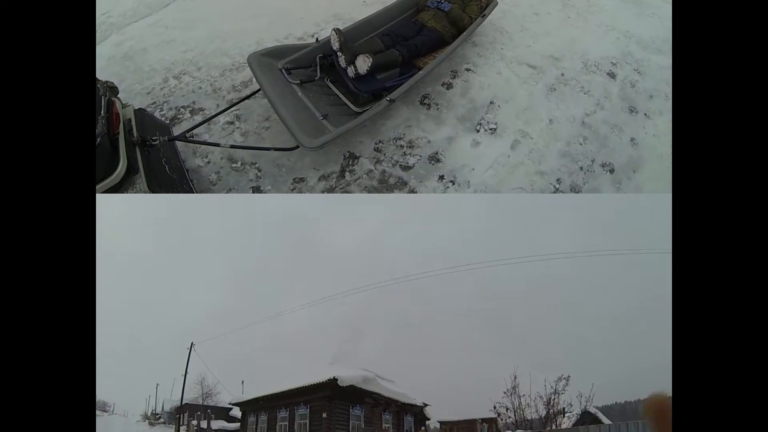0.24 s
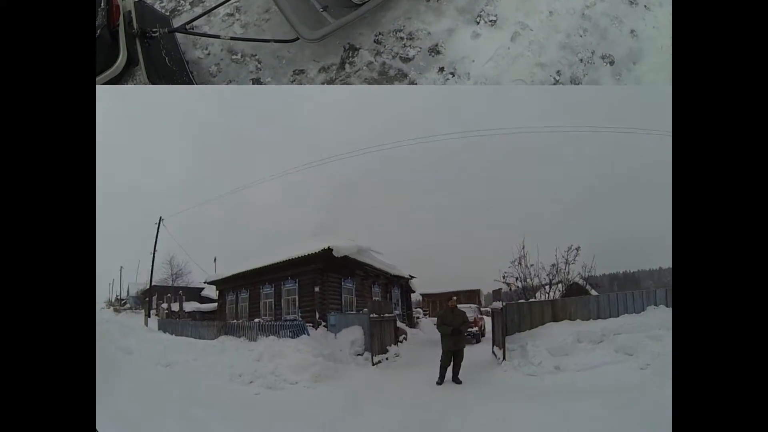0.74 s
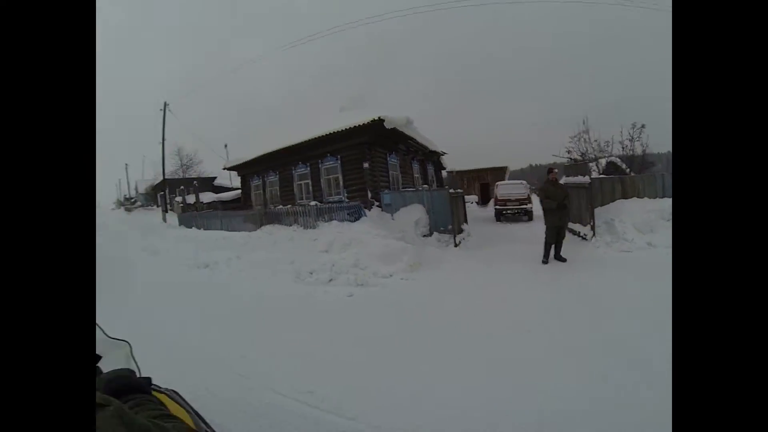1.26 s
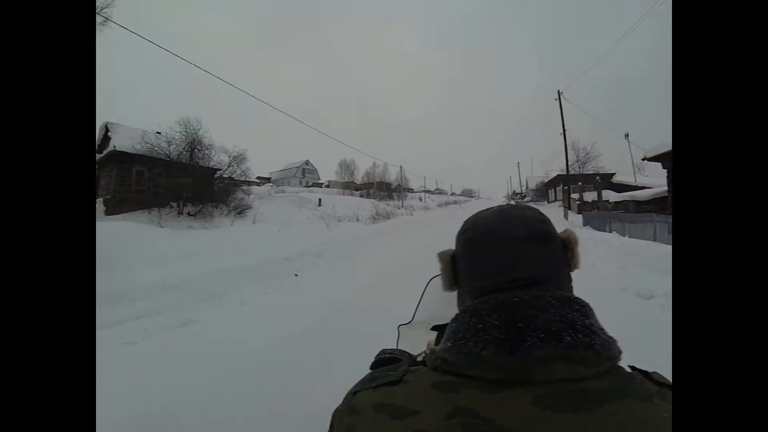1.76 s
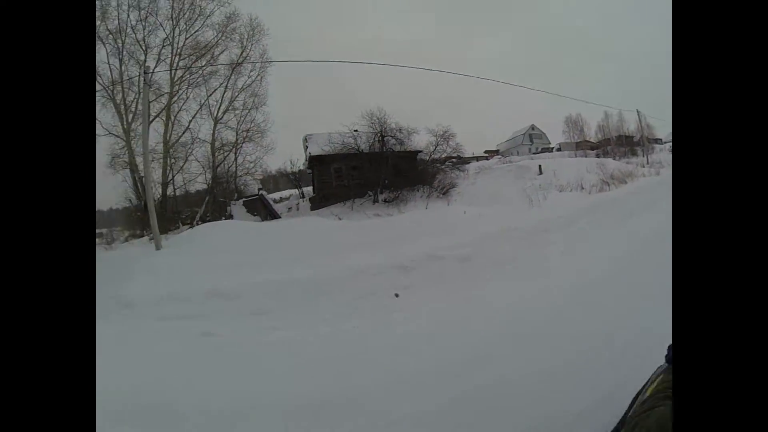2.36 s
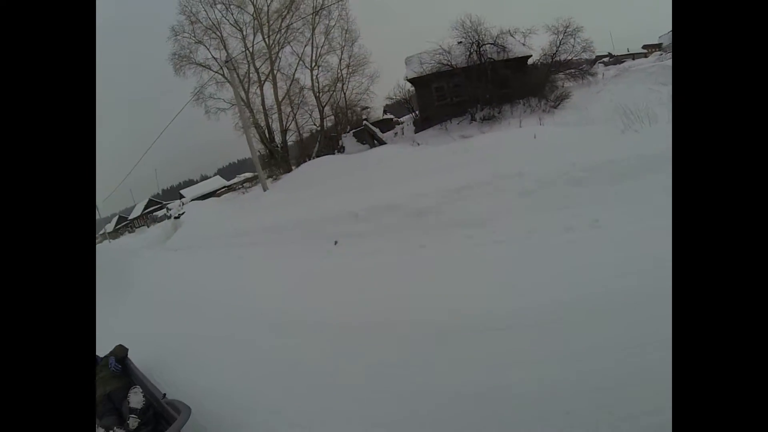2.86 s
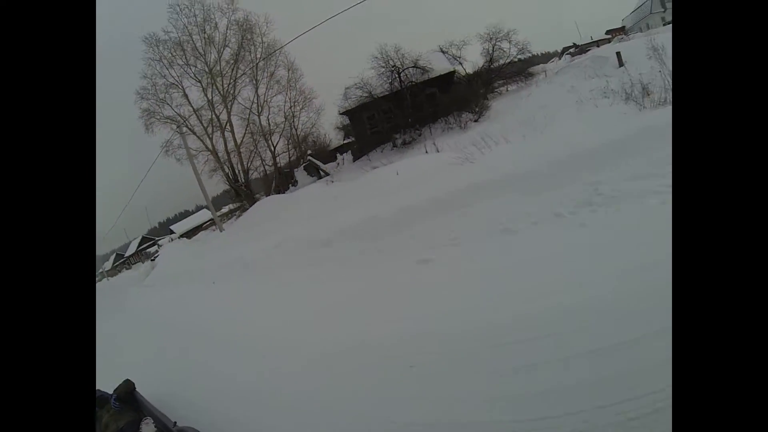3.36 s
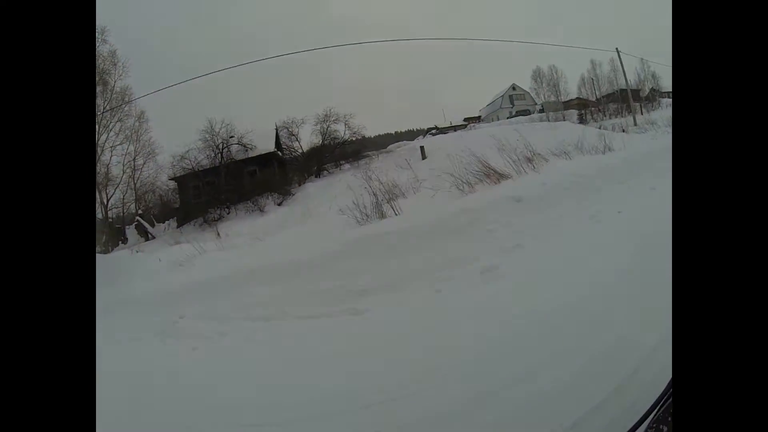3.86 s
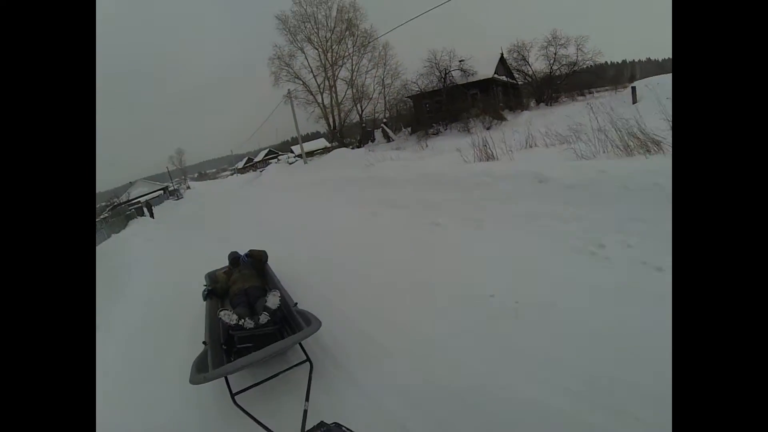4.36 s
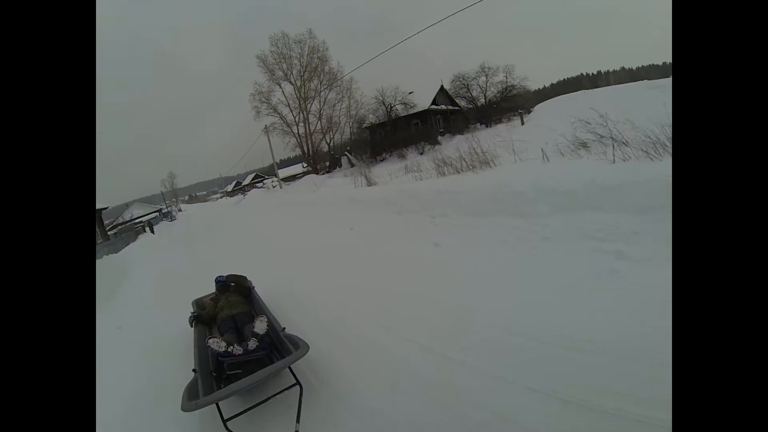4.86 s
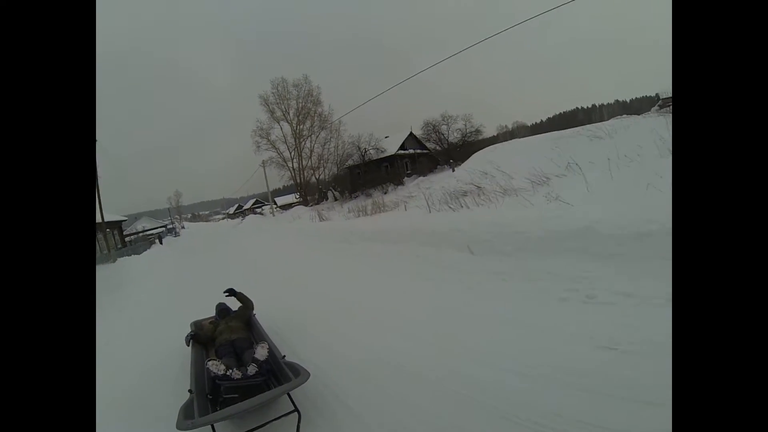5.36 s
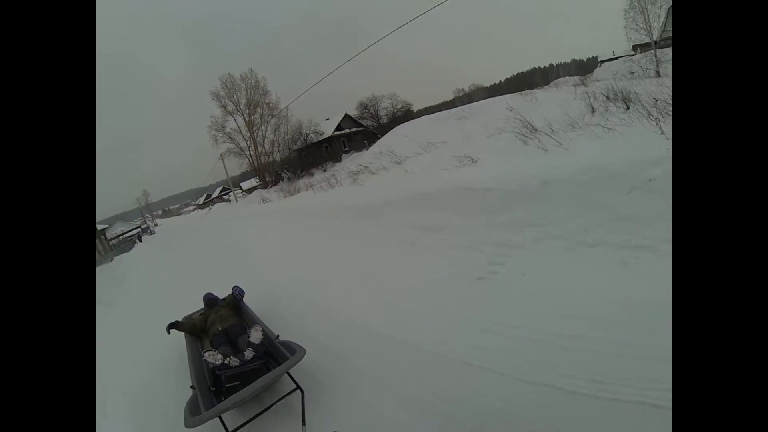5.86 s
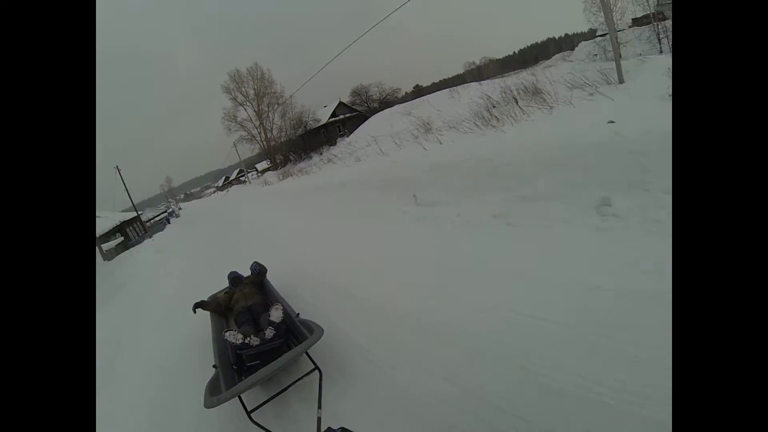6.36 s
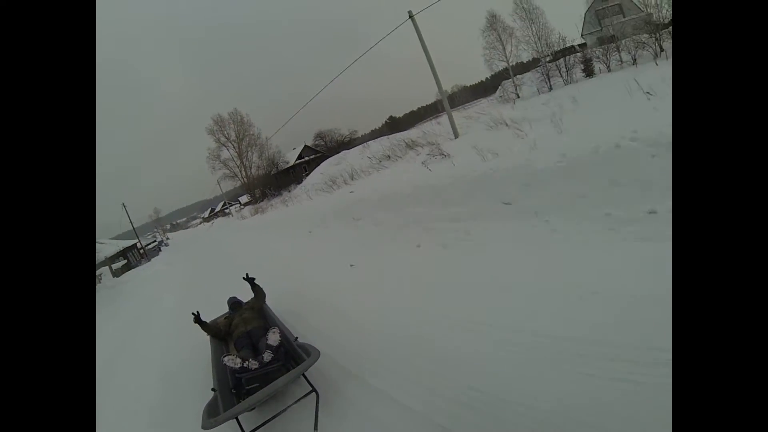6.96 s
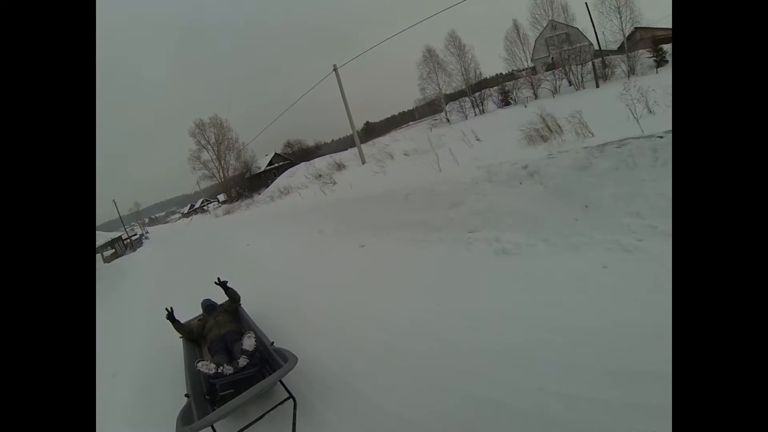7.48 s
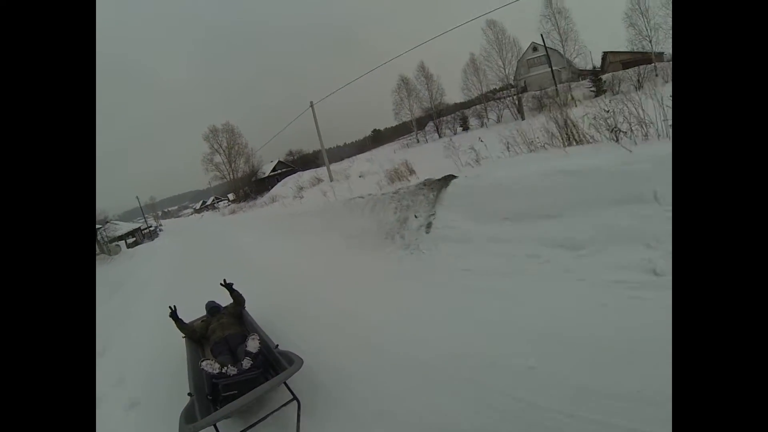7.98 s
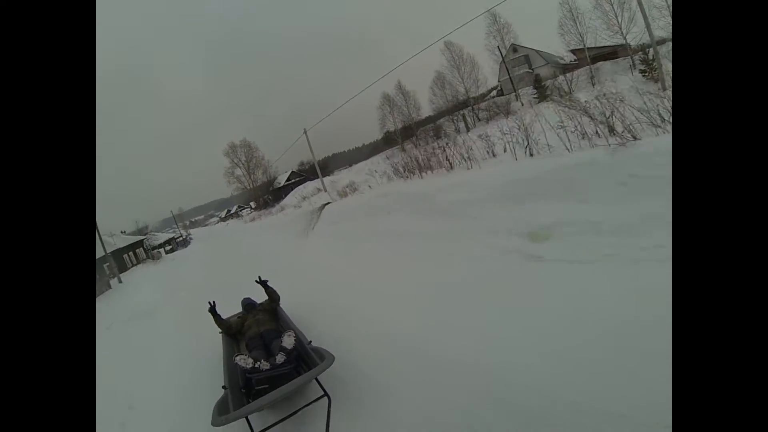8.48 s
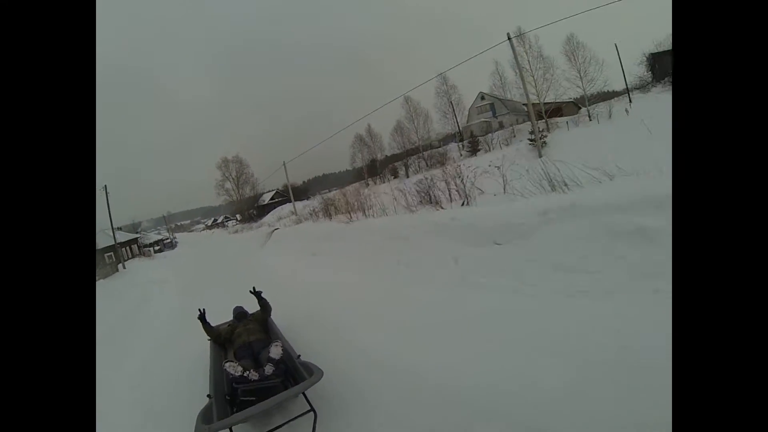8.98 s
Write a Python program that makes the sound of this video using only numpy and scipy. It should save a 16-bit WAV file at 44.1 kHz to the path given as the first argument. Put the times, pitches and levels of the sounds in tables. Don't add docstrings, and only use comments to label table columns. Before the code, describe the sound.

Outdoors on snow, with a muffled microphone riding on the snowmobile. First handling scrape and clicks, then abrupt silence for an instant. The twin-cylinder engine rises from low throb to raspy, steady high drone, joined by a track hum and grainy snow hiss. Rumbling airflow and sharp wind thumps grow heavy, making the level dip and recover repeatedly.

```python
import sys
import numpy as np
from scipy import signal
from scipy.fft import rfft, irfft, next_fast_len
from scipy.io import wavfile
from scipy.ndimage import map_coordinates

SR = 44100
rng = np.random.default_rng(int(sys.argv[2]) if len(sys.argv) > 2 else 0)


def volts(x):
    e = np.asarray(x, float) / 20
    return 10 ** e


def put_to_file(sound):
    columns = np.atleast_2d(sound).T
    safe = np.clip(columns, -1, 1)
    whole_steps = np.round(safe * 32767)
    wavfile.write(sys.argv[1], SR, whole_steps.astype(np.int16))


N = 407043


def unit(x):
    return x / np.sqrt(np.mean(x ** 2) + 1e-20)


def along(points, hz):
    f, v = np.transpose(points)
    return np.interp(np.log(hz + 1), np.log(f + 1), v)


def curves(rows):
    s, *cols = np.transpose(rows)
    return [np.interp(np.arange(N) / SR, s, c) for c in cols]


def wobble(rate, step=1):
    knots = rng.standard_normal(int(N * rate / SR) + 4)
    return map_coordinates(knots, [np.arange(0, N, step) * rate / SR])


def bumps(rows):
    ms = np.arange(0, N, 64) / SR * 1000
    total_db = sum(db * np.exp(-((ms - 1000 * s) / width_ms) ** 2) for s, db, width_ms in rows)
    return np.interp(np.arange(N) / SR * 1000, ms, total_db)


def filtered(x, response):
    m = next_fast_len(N + SR // 2)
    return irfft(rfft(x, m) * response(np.fft.rfftfreq(m, 1 / SR)), m)[:N]


def resonances(modes, f):
    total = 0
    for k, (centre, width, db) in enumerate(modes):
        damping = 1j * f * width
        total = total + (-1) ** k * volts(db) * damping / (centre * centre - f * f + damping)
    return total


def coloured(spectrum, gate):
    return unit(filtered(gate * rng.standard_normal(N), lambda hz: volts(along(spectrum, hz))))


# f/Hz, level/dB per Hz
SNOW_HISS = [(590, -11), (1000, -2), (1500, -4.5), (2930, -15.5), (4920, -28), (6000, -30), (8000, -26),
             (15000, -41)]
# t/s, level/dB, width/ms
HISS_SWELLS = [(.228, -1, 14), (.5, 0.5, 73), (1.22, 1.5, 20), (1.6, 0.5, 59), (1.9, 4.5, 16),
               (2.03, -1, 30), (2.45, 0.5, 80), (2.67, 3, 51), (3.05, -4, 89), (3.52, 0, 25),
               (3.73, -1, 40), (4.14, 3, 75), (4.25, 2.5, 23), (4.78, -2.5, 50), (4.94, 5.5, 82),
               (5.65, 0.5, 27), (5.81, 0, 20), (6.38, 4, 20), (6.535, 6, 28), (6.62, 3, 15),
               (6.735, 5.5, 24), (7.05, 2, 20), (7.3, 2.5, 52), (7.5, -4, 63), (7.8, 3, 25),
               (8.13, -2, 18), (8.31, 3, 23), (8.45, 4, 20), (8.56, 0.5, 26), (8.64, 4.5, 29),
               (9.14, 4, 60)]
# t/s, crack level/dB, knock level/dB
ICE_CHIPS = [(0.4364, -42, -32), (0.7277, -31, -29), (1.0844, -27, -26), (1.2585, -28, -28),
             (1.3434, -24.5, -22.5), (1.8871, -32, -18), (2.1874, -32, -14), (2.2697, -29, -20),
             (2.5311, -28, -23), (2.6339, -24, -16), (2.6798, -21, -15), (3.1597, -34, -29),
             (3.2405, -26, -21), (3.2495, -35, -18), (3.5957, -27, -12.5), (3.6874, -24, -31),
             (3.8267, -25, -26), (4.0183, -27, -25), (4.349, -22, -13), (4.4184, -25, -17),
             (4.4563, -26, -16), (4.5855, -29, -26), (4.6554, -25.5, -21), (4.8319, -37, -19),
             (4.8643, -30, -27), (4.8894, -30, -25), (4.9132, -30, -18), (4.935, -30, -16),
             (5.0574, -33, -29), (5.1098, -22, -20), (5.1374, -30, -20), (5.1694, -24, -27),
             (5.229, -22.5, -34), (5.3118, -26, -30), (5.3393, -24, -16), (5.5594, -29, -15),
             (5.8052, -27, -15), (6.0057, -26, -28), (6.0621, -24, -19), (6.4098, -22, -8.5),
             (6.5076, -33, -18), (6.548, -25, -25), (6.786, -27, -23), (6.8834, -31, -17.5),
             (7.0184, -27, -20), (7.3462, -28, -20), (7.7484, -25, -16), (7.9399, -29, -18),
             (8.0484, -37, -18.5), (8.1324, -32, -12.5), (8.2087, -24, -24), (8.307, -31, -22),
             (8.5939, -27, -16), (8.9244, -24.5, -18), (8.9431, -31.5, -18)]


def snow():
    firing = np.cos(2 * 2 * np.pi * np.cumsum(curves(SHAFT)[0]) / SR)
    grains = volts(1.3 * wobble(400) + 0.95 * wobble(30)) * (1 + .12 * firing)
    chips, t = np.zeros(N + 400), np.arange(400) / SR
    knock_t60_s, crack_t60_s = 0.0068, 0.025
    for s, crack_db, knock_db in ICE_CHIPS:
        knock_hz = 650 * (1 + 0.095 * rng.standard_normal())
        knock = volts(knock_db + 12 - 60 * t / knock_t60_s) * np.sin(2 * np.pi * knock_hz * t)
        crack = volts(crack_db + 12 - 60 * t / crack_t60_s) * rng.standard_normal(len(t))
        chips[round(s * SR):][:len(t)] += knock + crack
    dull = filtered(chips[:N], lambda hz: resonances([(900, 1600, 0)], hz) / (1 + 1j * hz / 1300))
    drift_db = .3 * wobble(6) + bumps(HISS_SWELLS)
    return volts(curves(FLOW_LEVELS)[1] + 4.5 + drift_db) * coloured(SNOW_HISS, grains) + dull


# t/s, width/s, level/dB
POWDER = (2.35, .3, -36.5)


def spray():
    at_s, width_s, peak_db = POWDER
    level_db = peak_db - 20 - 9 * ((np.arange(N) / SR - at_s) / width_s) ** 2
    spectrum = [(3800, -30), (5000, -3), (6500, 0), (8000, 3.5), (10000, -11)]
    return volts(level_db) * coloured(spectrum, volts(1.2 * wobble(300)))


# t/s, f/Hz, level/dB
LUG_HUM = [(2.3, 118, -38.5), (2.65, 124, -27.5), (3.1, 131, -27), (3.5, 136, -32), (5.4, 148, -31.5),
           (5.65, 154, -23), (6.1, 171, -23), (6.45, 173.5, -25.5), (6.8, 166, -31.5), (7.3, 172, -30),
           (9.23, 170, -33)]


def track():
    hz, level_db = curves(LUG_HUM)
    turn = 2 * np.pi * np.cumsum(hz) / SR + .4 * wobble(12)
    not_yet = np.arange(N) / SR < LUG_HUM[0][0]
    level_db = level_db - 60 * not_yet + 1.5 * wobble(8)
    octave_db = -11
    return np.sqrt(2) * volts(level_db) * (np.sin(turn) + volts(octave_db) * np.sin(2 * turn))


# t/s, signed jab size, width/ms, gain cut/dB
HARD_GUSTS = [(2.126, -0.62, 1.8, 1.5), (2.279, 0.55, 4.1, 2), (2.452, 0.96, 2.1, 0), (2.76, -0.88, 4.5, 7),
              (3.057, -0.91, 2, 10), (3.183, -0.44, 1.1, 6.5), (3.282, 0.86, 1.3, 1.5),
              (3.356, 0.62, 1.4, 5.5), (3.456, 0.89, 1.9, 4), (3.481, -0.86, 2, 9), (3.602, -1, 1.3, 10),
              (3.703, 0.74, 4.2, 10), (3.863, -1.8, 1.5, 4.5), (4.028, 0.68, 2.8, 4),
              (4.194, -1.25, 2.4, 11.5), (4.352, 0.76, 2.1, 2.5), (4.628, 0.84, 2.1, 0.5),
              (4.953, -0.56, 1.7, 6), (5.111, 0.71, 0.69, 2), (5.87, -1.3, 1.3, 7.5), (6.11, -0.33, 1.2, 4),
              (6.286, -0.58, 3.5, 2.5), (6.56, -0.79, 1.1, 2), (6.886, -1.85, 0.89, 2.5),
              (6.939, -1.2, 1.6, 3.5), (7.208, -0.11, 2.7, 8), (7.359, -0.87, 0.8, 2),
              (7.657, -0.69, 6.8, 12), (8.05, -0.44, 0.81, 2.5), (8.26, -0.78, 3.7, 6),
              (8.531, 0.39, 6.7, 3), (8.828, -1.3, 3.4, 14.5)]


def gusts():
    t = np.arange(0, N, 16) / SR
    air_db, ride_db, cut_db = 0, 0, 0
    air_swell_s, ride_swell_s, attack_s, recovery_s = 0.015, 0.25, .003, 0.084
    for s, _, _, depth_db in HARD_GUSTS:
        late = np.maximum(t - s - .002, 0)
        building = depth_db * (late == 0)
        air_db = air_db + 0.045 * building * np.exp(-((t - s) / air_swell_s) ** 2)
        ride_db = ride_db + 0.068 * building * np.exp(-((t - s) / ride_swell_s) ** 2)
        recovery = np.exp(-(late / recovery_s) ** 1.05)
        cut_db = cut_db + depth_db * (1 - np.exp(-late / attack_s)) * recovery
    return [np.interp(np.arange(N) / SR, t, db) for db in (air_db, ride_db, cut_db)]


def jab(s, size, width_ms):
    span = np.arange(-900, 900)
    t = span / SR * 1000 / width_ms[:, None]
    kick = np.exp(-np.sqrt(.16 + 2.2 * t * t)) * 1.7 - .3 * np.exp(-(t / 2.5) ** 2)
    at = np.clip(np.round(s * SR).astype(int)[:, None] + span, 0, N - 1)
    return np.bincount(at.ravel(), (size[:, None] * kick).ravel(), N)


# t/s, airflow level/dB, snow hiss level/dB
FLOW_LEVELS = [(.22, -42, -54.5), (.7, -23, -45), (1.22, -18, -36), (1.45, -15.5, -40), (1.62, -13, -44.5),
               (2.3, -14, -39), (2.7, -26, -30.5), (2.95, -14.5, -29.5), (3.2, -16, -34.5),
               (4.18, -15.5, -35), (4.45, -14, -41), (5.5, -13.5, -41), (5.85, -15.5, -37.5),
               (6.72, -14.5, -40.5), (7.22, -15, -39), (7.6, -14, -35.5), (8.5, -10.5, -37.5),
               (9.23, -17, -42.5)]
# f/Hz, level/dB per Hz
BUFFET_SPECTRUM = [(8.8, -32), (15, 5), (37, -1), (86, 1), (162, -8), (454, -18.5), (780, -43),
                   (1320, -120)]
# t/s, level/dB, width/ms
HEAVES = [(1.083, -4.2, 52), (1.856, -2, 25), (2.03, 2, 75), (2.155, -3.5, 43), (2.28, 2.5, 70),
          (2.375, -2.5, 55), (2.454, 2, 29), (2.629, -2, 54), (2.754, 3, 80), (2.799, -7.4, 26),
          (2.928, -1.5, 20), (3.043, 0.5, 70), (3.153, -6, 30), (3.228, -12, 21), (3.317, -8, 18),
          (3.357, 3.5, 35), (3.402, -12, 23), (3.467, 4.1, 48), (3.517, -5.5, 61), (3.602, 3, 27),
          (3.697, 0, 21), (3.737, -12, 32), (3.861, 1, 54), (3.971, -3, 44), (4.021, 2.5, 26),
          (4.061, -5, 32), (4.121, 5, 27), (4.161, -11, 22), (4.195, 0, 30), (4.235, -9.0, 27),
          (4.744, -5.5, 24), (4.954, 1, 30), (5.408, -7, 23), (5.672, -2.5, 32), (5.867, 1.5, 47),
          (5.991, -4, 35), (6.331, -7.5, 27), (6.42, 4.5, 91), (6.525, -3, 39), (6.829, -2.5, 30),
          (6.939, 0.5, 60), (6.969, -6.5, 43), (7.328, -3, 34), (7.463, -7, 25), (7.543, -8, 26),
          (7.658, 1.5, 44), (7.797, -1.5, 85), (8.027, 2.5, 46), (8.296, -4, 22), (8.526, -0.5, 64),
          (8.73, 2, 41), (8.785, -5, 29), (8.83, 2, 34), (8.865, -4.5, 42), (8.975, -6, 17), (9.134, 2, 23)]
# t/s, signed size, width/ms
OTHER_JABS = [(0.736, -0.49, 1.2), (0.924, -0.47, 0.81), (1.156, -0.9, 1.1), (1.334, -0.38, 0.62),
              (1.385, 0.92, 0.95), (1.403, -0.96, 0.83), (1.432, -1, 1.1), (1.735, 0.27, 1.7),
              (1.89, -0.77, 0.51), (2.544, -0.21, 1.8), (2.721, 0.34, 0.78), (2.741, -0.53, 1.4),
              (2.888, -0.82, 0.34), (2.906, 0.24, 1.4), (2.958, -0.25, 1.7), (3.034, -0.73, 3.5),
              (3.454, 1, 0.84), (3.549, -0.86, 1.8), (3.8, -0.68, 1.6), (4.012, 0.44, 1.8),
              (4.111, -1, 0.67), (4.131, -0.42, 2), (4.304, 0.65, 1.3), (4.424, 0.58, 0.62),
              (4.488, -0.55, 1.3), (4.536, -0.76, 2.2), (4.557, 0.55, 1.5), (4.771, -0.21, 1.5),
              (4.779, -0.79, 3.6), (4.921, -0.76, 0.49), (5.019, 0.66, 2), (5.227, 0.66, 1.7),
              (5.34, 0.52, 0.98), (5.595, -0.45, 0.7), (5.716, 0.78, 1.2), (5.744, 0.99, 0.75),
              (5.83, -0.85, 0.72), (6.035, 0.55, 1.3), (6.065, -1.1, 1.5), (6.158, -1, 1.2),
              (6.211, -0.78, 0.7), (6.409, 0.89, 1.4), (6.426, 0.8, 1.3), (6.668, -0.69, 1.1),
              (6.718, -0.85, 0.94), (6.758, -0.94, 1.7), (6.788, -0.69, 2.2), (7.05, -0.77, 1.1),
              (7.422, -0.9, 3.1), (7.576, 0.13, 1.6), (7.824, 1, 0.77), (8.112, -0.7, 1.1),
              (8.335, -0.78, 1.6), (8.598, 0.6, 0.74), (8.636, 1, 0.92), (8.724, -0.61, 1.6),
              (8.948, -0.61, 1.5), (9.01, -0.66, 1.7), (9.139, -0.73, 2.3), (9.193, -0.52, 0.82)]


def wind(swell_db):
    heave_db = bumps(HEAVES)
    buffet = volts(curves(FLOW_LEVELS)[0] + swell_db + heave_db)
    air = buffet * coloured(BUFFET_SPECTRUM, volts(1.8 * wobble(65) + 1.1 * wobble(14)))
    s, size, width_ms = np.transpose([row[:3] for row in HARD_GUSTS + OTHER_JABS])
    air += jab(s, 1.34 * size, width_ms)
    from_s, count = 1.8, 40
    when, side, big, wide = rng.random((count, 4)).T
    s = from_s + (np.arange(count) + when) / count * (N / SR - from_s)
    size = np.sign(side - .6) * 0.33 * (.5 + big) * volts(heave_db[(s * SR).astype(int)])
    air += jab(s, size, 3 * np.exp(0.25 * 3 * (wide - .5)))
    eddies = (rng.random(N) < 60 / SR) * rng.standard_normal(N)

    def eddy_response(hz):
        rise = (hz / 90) / (1 + hz / 90)
        return rise / (1 + (hz / 330) ** 2) / (1 + (hz / 800) ** 4)

    return air + volts(-12.5) * buffet * unit(filtered(eddies, eddy_response))


# t/s, rub level/dB, thud level/dB
SCRAPE_LEVELS = [
    (0, -57, -40),
    (.023, -53, -49),
    (.03, -40.5, -50),
    (.07, -37, -56),
    (.1, -46.5, -58),
    (.112, -39.5, -57),
    (.136, -40.5, -49),
    (.142, -61, -53),
    (.19, -73, -52),
]
# f/Hz, width/Hz, level/dB
MOUNT_MODES = [(845, 820, 1), (1730, 360, 5.5), (2620, 560, 0), (3840, 320, 4), (5270, 460, -3),
               (6600, 310, -13)]
# t/s, peak level/dB, f/Hz
MOUNT_CLICKS = [
    (0.104, -27, 1670),
    (.146, -28, 1230),
    (.156, -17, 1110),
]


def mount():
    rub_db, thud_db = curves(SCRAPE_LEVELS)

    def plastic(f):
        return sum(resonances([mode], f) ** 2 for mode in MOUNT_MODES) * (1 + (f / 6500) ** 4)

    rub = unit(filtered(volts(.6 * wobble(293)) * rng.standard_normal(N), plastic))
    thud = coloured([(20, -25), (60, 15.0), (150, -10.5), (300, -5), (700, -28)], 1)
    sound = volts(rub_db) * rub + volts(thud_db) * thud
    fizz_s, fizz_span_s = 0.07, .022
    fizz_db = -46 - 8 * ((np.arange(N) / SR - fizz_s) / fizz_span_s) ** 2
    sound += volts(fizz_db) * coloured([(4500, -47), (7500, 2), (12000, -5.0), (15000, -26)], 1)
    t = np.arange(2000) / SR
    for s, db, hz in MOUNT_CLICKS:
        snap = np.sin(2 * np.pi * hz * t) + 0.031 * np.sin(2 * np.pi * 3600 * t)
        ring = volts(db - 25 - 60 * t / .15) * np.sin(2 * np.pi * 640 * t)
        sound[round(s * SR):][:len(t)] += volts(db - 60 * t / .006) * snap + ring
    return sound


# t/s, shaft f/Hz, load level/dB, exhaust and intake level/dB toward the port
SHAFT = [(.22, 60.7, -37, -28.5, -33.5), (.63, 62.6, -25, -15.5, -26.5), (.78, 64.3, -23.5, -18, -24),
         (1.3, 67.08, -14.5, -5, -40), (1.6, 69.63, -16.5, -21, -21.5), (2.13, 76.9, -19, -20, -16.5),
         (2.53, 86.2, -15, -15.5, -17.5), (2.72, 88.66, -11.5, -28, -14), (2.9, 90.9, -17.5, -26, -19.5),
         (3.85, 93.54, -19, -16.5, -22.5), (4.15, 97.7, -17, -16, -21), (4.6, 96.75, -23.5, -30, -37.5),
         (5.56, 97.3, -24, -22, -26), (5.89, 105.4, -15.5, -14.5, -22.5), (6.17, 107.3, -22.5, -18, -26.5),
         (6.79, 104.3, -25, -39, -29), (7.4, 108.3, -24, -40.5, -26), (9.23, 100.6, -26, -26, -31)]
# f/Hz, width/Hz, level/dB
PIPE_MODES = [
    [(120.8, 28, 2.5), (190.7, 17, -0.5), (251.7, 62, 3.5), (368, 74, -3.5)],
    [(446.5, 21.4, 0), (536, 62, -14.5), (756, 73, -13.5)],
    [(1180, 100, -10), (1430, 130, -6.5), (1572, 80, -6.5), (1820, 180, -14)],
    [(87, 43, 1), (666, 214, -3.5), (1037, 72, -7), (1185, 61, -9)],
]
# level/dB, dB per Hz over idle, share of load, of exhaust, of intake
VOICE_MIX = [
    (-4, -0.266, 0.8, .01, 0.019),
    (1, 0.0213, 0.012, 0.9, .01),
    (-9, -0.1048, .01, 1.14, .01),
    (-1.7, 0.1017, 0.033, 0.03, 1),
]
STAGES = (62, 78, 88, 90.5, 97.5, 100)
# order, level/dB pulling away, cruising, flat out
ORDER_SHIFTS = [(1, -7, -7, -7), (2, 2, 3, 0), (3, -9, -6, -4), (4, 0, 2, 3), (5, 5.5, 4, 7),
                (6, -3, 2, 4.5), (7, -.5, 2, -1), (8, 4, -7, -4), (9, -3.5, -3, -3), (10, -1.5, 0, -1.5),
                (11, -2, 5, 4), (12, 0, -4, -3), (13, 0, -1, -2.5), (14, 0, 0, 0), (15, 4, 3, 5),
                (16, 1, 0, 4), (17, 3, 4, 2), (19, 4, 2, 0)]
# f/Hz, level/dB per Hz
ROAR_SPECTRUM = [(60, -42), (150, 5.5), (260, -4.5), (500, -5.5), (900, -11), (1500, -21), (2500, -37),
                 (5000, -68.5)]
# t/s, width/s, orders level/dB, roar level/dB
THROTTLE_BLIP = (5.71, .17, 5, -2)


def engine():
    idle_hz = 60
    shaft_hz, *controls_db = curves(SHAFT)
    coarse_hz = shaft_hz[::64]
    controls = [c[::64] for c in (shaft_hz - idle_hz, *controls_db)]
    voices_db = [db + np.dot(shares, controls) for db, *shares in VOICE_MIX]
    turn = 2 * np.pi * np.cumsum(shaft_hz * (1 + .0015 * wobble(14))) / SR
    tone = np.zeros(N)
    pull = np.interp(coarse_hz, STAGES[:2], [0, 1])
    for k in range(1, 31):
        pipe = 0
        for modes, db in zip(PIPE_MODES, voices_db):
            pipe = pipe + volts(db) * sum(np.abs(resonances([mode], k * coarse_hz)) ** 2 for mode in modes)
        order_db = -(1.5 + 0.32 * k) * (k % 2) * (1 - 0.26 * pull)
        for order, away, cruise, flat_out in ORDER_SHIFTS:
            if order == k:
                order_db = order_db + np.interp(coarse_hz, STAGES, [0, away, away, cruise, cruise, flat_out])
        shake_db = .8 * wobble(5, 64) + 1.1 * wobble(20, 64)
        drift_db = coarse_hz / 60 * shake_db - (coarse_hz - 60) / 30
        flutter = 0.0027 * (coarse_hz - idle_hz + 5) * np.sqrt(k) * wobble(25, 64)
        flutter = flutter + rng.uniform(0, 2 * np.pi)
        at, knots = np.arange(N) / 64, np.arange(len(pipe))
        size = np.interp(at, knots, pipe * volts(order_db + drift_db))
        tone += size * np.sin(k * turn + np.interp(at, knots, flutter))
    puffs = 1 + .35 * np.cos(2 * turn) + 0.17 * np.cos(turn)
    roar = coloured(ROAR_SPECTRUM, puffs * volts(2.1 * wobble(30)))
    at_s, width_s, orders_db, roar_db = THROTTLE_BLIP
    blip = np.exp(-((np.arange(N) / SR - at_s) / width_s) ** 2)
    roar_level_db = controls_db[0] - 1.5 + roar_db * blip + .7 * wobble(7)
    return volts(orders_db * blip) * tone + volts(roar_level_db) * roar


# start t/s, end t/s
SILENCE = (.187, 0.2207)


def scene():
    t = np.arange(N) / SR
    before = t < SILENCE[0]
    after = np.clip((t - SILENCE[1]) / 0.0045, 0, 1)
    swell_db, ride_db, cut_db = gusts()
    ride = volts(ride_db - cut_db - 2.0) * (engine() + snow())
    air = volts(-1.0 - 0.4 * cut_db) * wind(swell_db)
    slip = volts(-cut_db) * (track() + spray())
    return (before * mount() + after * (ride + air + slip))[None]


def roll_off(x):
    return signal.sosfilt(signal.butter(12, 15800, fs=SR, output="sos"), x)


# f/Hz, level/dB
HOUSING = [(5800, -0.5), (7000, -11.5), (8300, -27.5), (9500, -22.5), (11500, -25.5), (13500, -37),
           (16000, -42)]


def record(dry):
    held = dry / (1 + (dry / .98) ** 4) ** (1 / 4)
    muffled = filtered(held[0], lambda hz: volts(along(HOUSING, hz)))[None]
    muffled[:, round(SILENCE[0] * SR) - 2:round(SILENCE[1] * SR) - 40] = 0
    return roll_off(muffled)


dry = scene()
out = record(dry)
put_to_file(out)
```